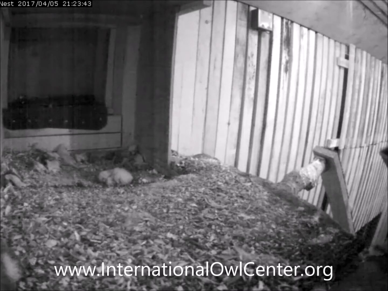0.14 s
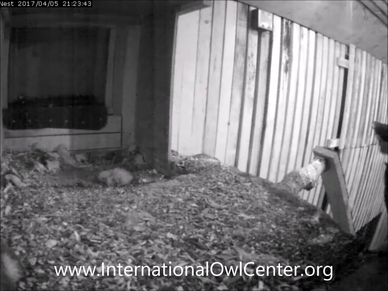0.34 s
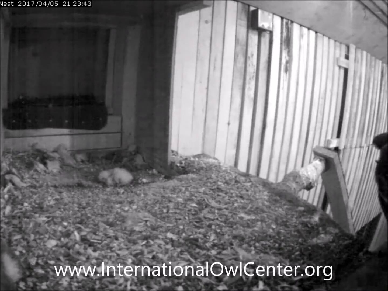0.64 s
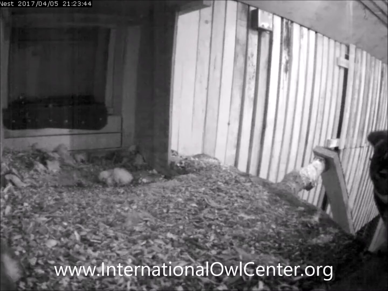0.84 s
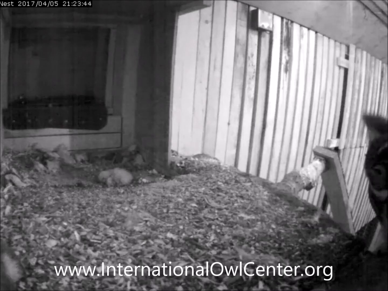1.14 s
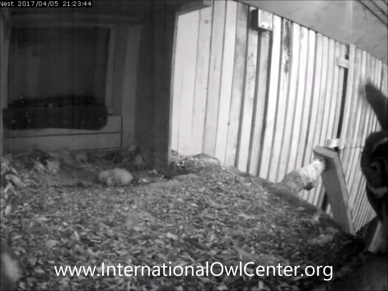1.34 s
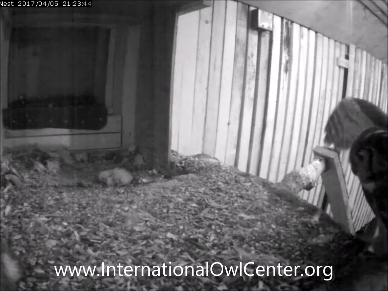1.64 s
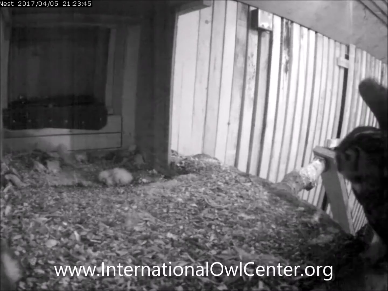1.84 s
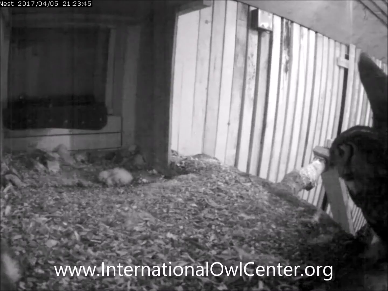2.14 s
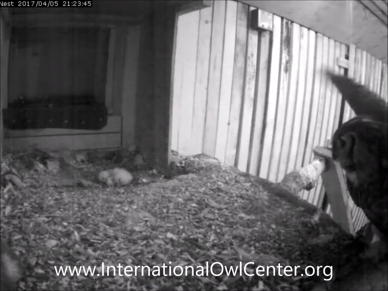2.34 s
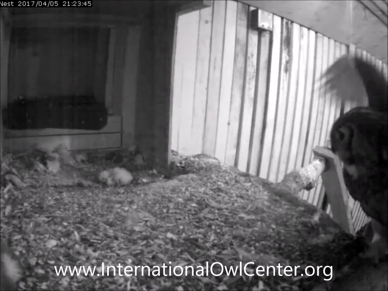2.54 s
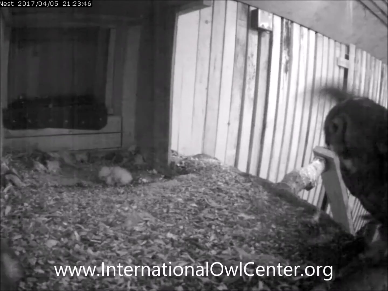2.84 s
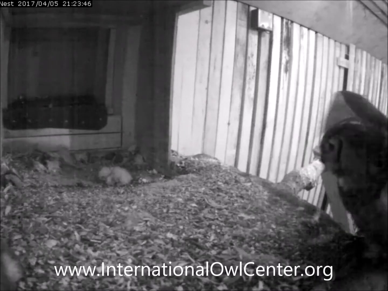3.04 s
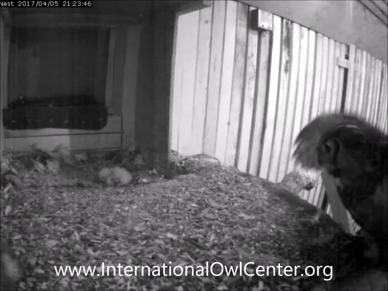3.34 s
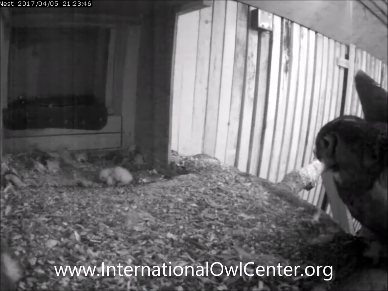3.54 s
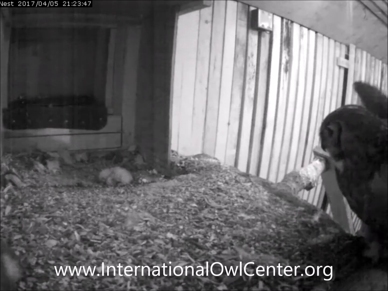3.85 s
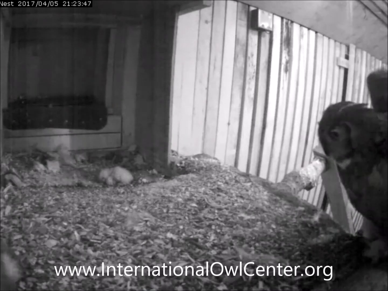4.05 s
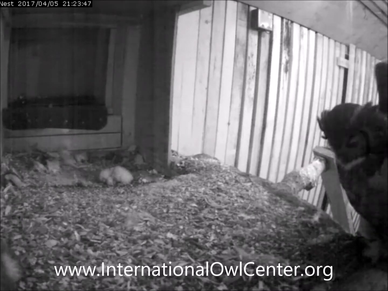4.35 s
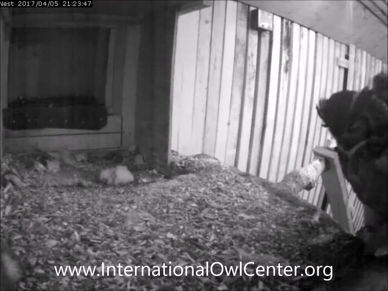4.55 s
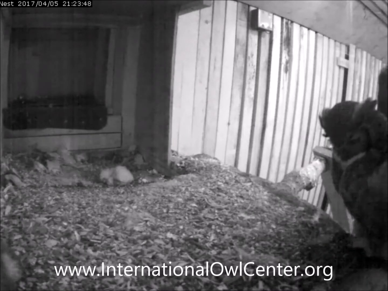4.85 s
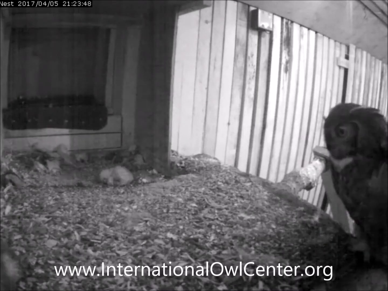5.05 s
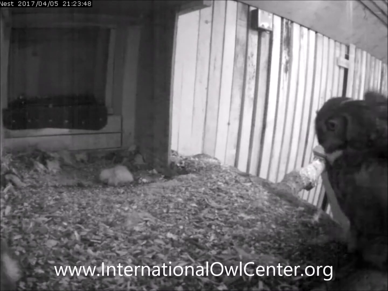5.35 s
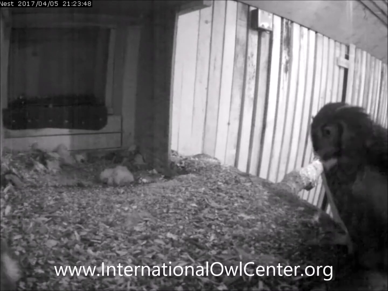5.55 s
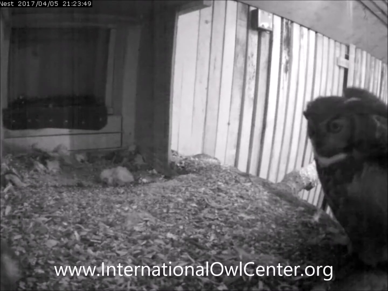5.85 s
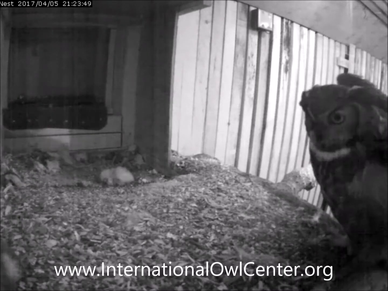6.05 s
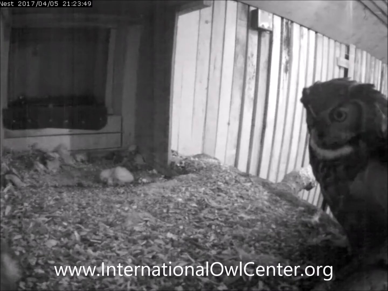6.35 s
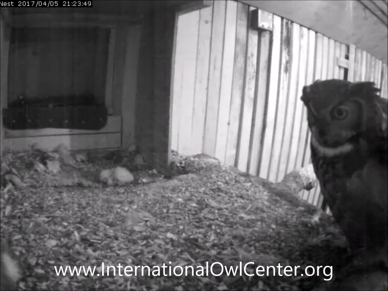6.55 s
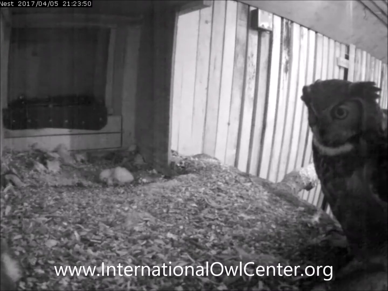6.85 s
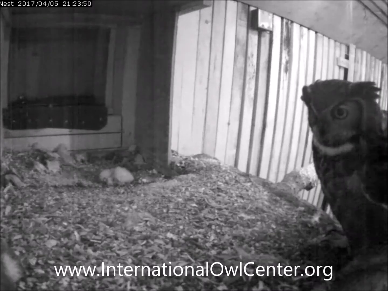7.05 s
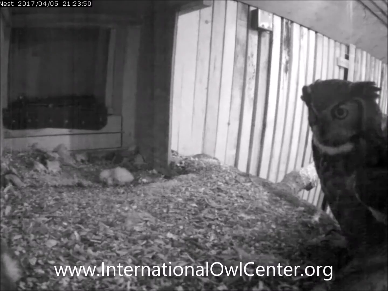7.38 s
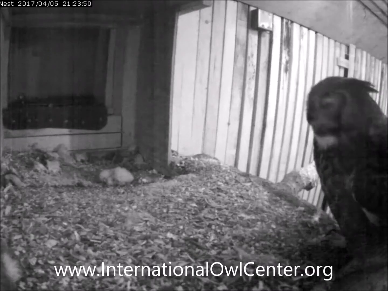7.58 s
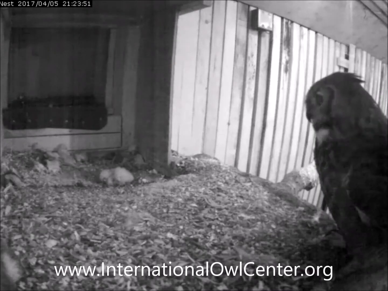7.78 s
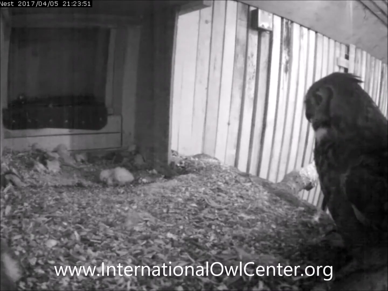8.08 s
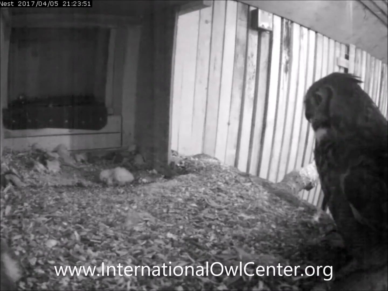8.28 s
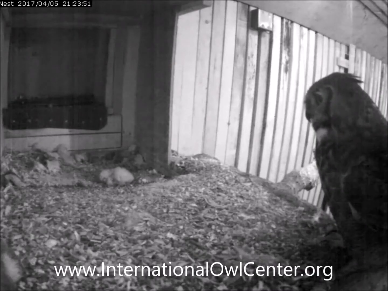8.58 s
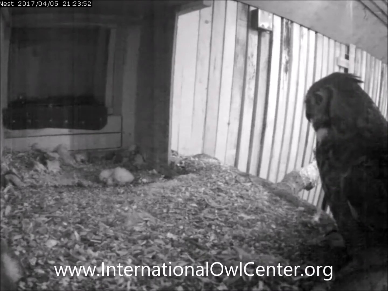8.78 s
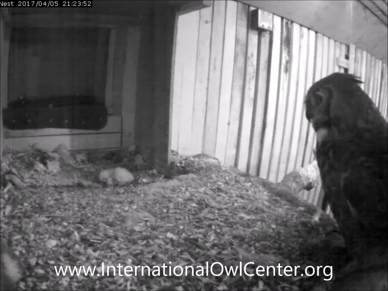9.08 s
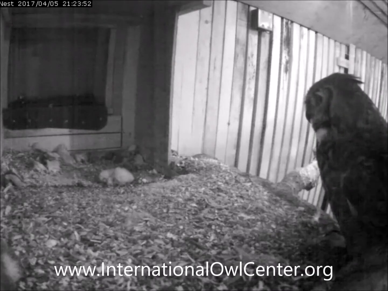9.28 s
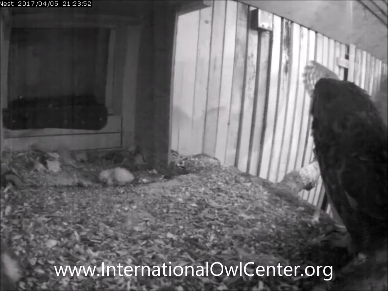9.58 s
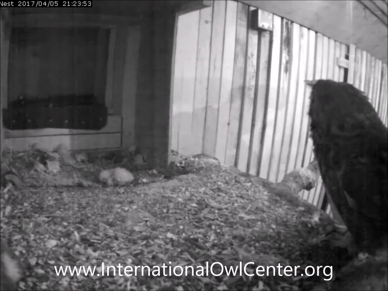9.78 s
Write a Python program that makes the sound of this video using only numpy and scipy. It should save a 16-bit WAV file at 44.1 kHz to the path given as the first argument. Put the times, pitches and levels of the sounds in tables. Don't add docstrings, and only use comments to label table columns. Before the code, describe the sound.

Dry wooden claw taps and feathery rustles, brief high chirrups nearby, one hard knock, then low wing puffs swelling over hiss and faint motor hum.

```python
import sys
import numpy as np
from scipy import signal
from scipy.fft import rfft, irfft, next_fast_len
from scipy.io import wavfile
from scipy.ndimage import uniform_filter1d

SR = 44100
rng = np.random.default_rng(int(sys.argv[2]) if len(sys.argv) > 2 else 0)


def gain_from_db(level_db):
    decades = np.asarray(level_db, float) / 20
    return 10 ** decades


def wrap_up_sound(samples):
    columns = np.atleast_2d(samples).T
    tamed = np.clip(columns, -1, 1)
    steps = np.round(tamed * 32767).astype(np.int16)
    wavfile.write(sys.argv[1], SR, steps)


N = 437472

# frequency in Hz, level in dB per Hz.
HISS_SPECTRUM = [(12, -73.5), (20, -32), (60, -20), (90, -19), (149, -7.5), (264, -6.5), (392, -7.5),
                 (541, -6), (785, -8), (1260, -10.5), (2230, -14), (2920, -14.5), (3750, -16),
                 (6790, -16.5), (7500, -28.5), (9750, -78), (16500, -120)]
HISS_DB = -45.5
CAPSULE_HZ, CAPSULE_WIDTH_HZ, CAPSULE_DB = 2819, 357, -49.5
MOTOR_HZ = 106.27
# multiple of the motor pitch, level in dB rms.
MOTOR_OVERTONES = [(3, -67), (4, -59.5), (5, -58), (7, -69.5)]

# frequency in Hz, level in dB per Hz.
PUFF_SPECTRUM = [(12, -57.5), (20, -30.5), (258, -2.5), (340, -2.5), (382, -3), (493, -3.5), (676, -4.5),
                 (807, -4.5), (2200, -19.5), (2860, -41.5), (4840, -120)]
# frequency in Hz, level in dB per Hz.
FEATHER_SPECTRUM = [(710, -26), (1200, -7), (2660, -6.5), (6580, -20), (7050, -21), (7500, -69),
                    (9750, -110), (16500, -120)]
# peak in seconds, puff level in
# dB, feather hiss in dB above the puff.
BEATS = [(7.745, -43, -3), (8.0, -42, -8), (8.2, -46, -5), (8.28, -42, -12), (8.41, -34.5, -8.5),
         (8.61, -36, -4.5), (8.8, -33.5, -10), (8.95, -36.5, -7.5), (9.16, -31, -8.5), (9.35, -32, -11),
         (9.57, -31, -11), (9.63, -42, 3), (6.25, -42, -25)]
BEAT_SWELL_S, BEAT_FADE_S = .11, .19
# time in seconds, level in dB.
STIRRED_AIR = [
    (7.55, -70),
    (7.66, -56),
    (7.8, -46),
    (8.15, -44),
    (9.0, -42),
    (9.64, -42),
    (9.75, -56),
    (9.84, -50),
    (9.92, -62),
]
STIR_FEATHER_DB = -10.5
# start in seconds,
# level in dB, pitch in Hz, t60 in seconds.
SLAPS = [(7.686, -36, 530, .04), (7.727, -33, 996, .03), (7.75, -33, 450, .04), (7.849, -35, 493, .04),
         (7.907, -36, 474, .03), (7.941, -36, 493, .03), (7.99, -32, 450, .03), (7.995, -32, 980, .04),
         (8.13, -35, 800, .03), (8.213, -34, 487, .04), (8.411, -31, 315, .05), (8.611, -30, 345, .05),
         (8.843, -32, 471, .04), (8.936, -31, 226, .06), (9.049, -31, 385, .05), (9.150, -24, 600, .025),
         (9.18, -27, 230, .05), (9.304, -27, 382, .05), (9.335, -25, 480, .05), (9.362, -24, 750, .07),
         (9.288, -30, 1000, .04), (9.32, -28, 1100, .04), (4.672, -24, 210, .1), (9.385, -25, 700, .04),
         (9.433, -29, 401, .04), (9.535, -22, 380, .06), (9.555, -23, 270, .06), (9.566, -23, 420, .05),
         (9.597, -28, 1150, .05)]

# start in seconds, drop's start in Hz, drop level in dB, flick delay in seconds, flick level in dB.
CHIRRUPS = [
    (2.649, 2500, -39, .043, -31),
    (2.936, 3020, -40, .0305, -24.5),
    (3.515, 3400, -55, .026, -31),
    (3.640, 3400, -27.5, .034, -29.5),
    (3.774, 3800, -25, .035, -26),
    (3.889, 3300, -33, .03, -55),
    (4.301, 2450, -32, .0125, -29),
    (4.425, 3155, -26, .037, -29.5),
    (4.56, 3800, -24.5, .034, -32),
]
DROP_END_HZ, DROP_S = 2100, .0072
HOLD_AFTER_S, HOLD_HZ, HOLD_END_HZ, HOLD_S, HOLD_DB = .006, 4000, 4300, .015, -11
LEAD_HZ, LEAD_S, LEAD_DB = 2900, .004, -14
FLICK_HZ, FLICK_END_HZ, FLICK_S = 3480, 4100, .0055
TOP_AFTER_S, TOP_HZ, TOP_END_HZ, TOP_S, TOP_DB = .0042, 4000, 4400, .0065, -1.5
# start in seconds, pitch
# in Hz, # length in seconds, level in dB.
PEEPS = [(2.674, 2700, .007, -37), (2.936, 2800, .007, -29), (2.944, 2900, .005, -28),
         (3.082, 3750, .014, -34), (3.102, 3000, .025, -35), (3.893, 4250, .014, -34),
         (3.911, 3890, .013, -39.5), (3.921, 3000, .025, -33), (4.432, 2950, .0037, -26),
         (4.45, 2800, .004, -36), (4.471, 2900, .0061, -35), (4.6865, 3750, .005, -20),
         (4.810, 4300, .0097, -36), (4.825, 4400, .04, -44), (4.811, 3070, .015, -37.5),
         (6.024, 1350, .026, -42), (2.649, 4200, .006, -44), (4.316, 3700, .0045, -26),
         (4.301, 3900, .004, -44), (4.321, 3100, .007, -38), (4.567, 3100, .006, -31),
         (3.646, 3100, .008, -33), (4.46, 2900, .006, -39)]
PEEP_SAG = .09
OVERTONE_DB, WOBBLE = -23, .015
BREATH_DB, BREATH_LOW_HZ, BREATH_HIGH_HZ, BREATH_FADE_S = -11, 2000, 4600, .018

# frequency in Hz, level in dB per Hz.
RUSTLE_LOW = [(60, -68), (150, -17), (330, -15), (620, -1), (1100, -4.5), (2000, -7.5), (2600, -16),
              (3300, -43)]
# frequency in Hz, level in dB per Hz.
RUSTLE_HIGH = [(820, -31), (1400, -5), (1910, -19), (2470, 5.5), (6080, -9.5), (7240, -23), (7500, -69),
               (9750, -95), (16500, -120)]
# peak in seconds, level in dB, swell in seconds per 20 dB, fade in seconds per 20 dB, brightness in
# dB.
DRAGS = [(.492, -31.5, .065, .05, 3), (1.09, -55, .2, .12, 10), (1.525, -43, .15, .06, -6.5),
         (1.61, -41.5, .025, .03, 0), (1.85, -47, .2, .3, -2), (1.927, -41, .04, .06, -4),
         (2.045, -33, .13, .05, -5), (2.1, -46, .1, .1, -4), (2.77, -41, .07, .05, 1),
         (2.845, -37, .04, .05, 8), (3.095, -41, .03, .04, 2), (3.2, -32, .03, .12, -5),
         (3.27, -43, .1, .2, 1), (4.19, -37, .04, .1, -1), (4.615, -28.5, .015, .22, -5),
         (4.7, -28, .07, .085, -5), (4.8, -42, .06, .22, -1.5), (4.96, -48, .2, .3, -2),
         (5.405, -36.5, .04, .05, -7.5), (5.542, -34, .07, .07, -1), (5.61, -49, .1, .15, -2),
         (6.205, -40, .03, .03, 5), (6.78, -45, .1, .1, 1.5), (6.9, -45, .14, .06, 0),
         (7.74, -40, .04, .05, 2), (7.855, -46, .03, .04, -5), (7.997, -41, .03, .04, -8),
         (8.215, -46, .03, .03, 0), (9.152, -36, .03, .03, -3), (9.55, -39, .02, .2, 1),
         (2.225, -50, .04, .04, 0), (.455, -40, .02, .05, 0)]
DRAG_BEND = 1.6

# start in seconds, level in dB, t60 in seconds, lowest frequency in Hz.
TEARS = [(6.2213, -22, .03, 2400), (6.2258, -24, .025, 3200), (2.8296, -21, .04, 900),
         (2.8503, -19, .02, 800), (2.8555, -25, .04, 900), (2.9136, -24, .035, 700),
         (3.1381, -22, .035, 1600), (3.0825, -33, .08, 900), (3.6562, -30, .008, 3000),
         (3.2185, -28, .02, 1200), (7.738, -32, .05, 1200), (4.712, -33, .14, 2400),
         (7.3615, -36, .04, 1200), (1.5200, -37, .06, 700), (6.877, -38, .05, 700)]
# frequency in Hz, level in dB, t60 in seconds.
BOARD_MODES = [(248, -2, 0.14), (573, -30, 0.038), (710, 4, 0.19), (900, -1, 0.09), (1120, -24, 0.067),
               (1250, 4, 0.078), (1360, -27, 0.056)]
# frequency in Hz, level in dB, t60 in seconds.
EDGE_MODES = [(1700, -15.5, 0.013), (2016, -3.5, 0.021), (2300, 8.5, 0.012), (2823, 3.5, 0.017),
              (3400, 1.5, 0.027), (3800, 2, .03)]
# frequency in Hz, level in dB, t60 in seconds.
TIP_MODES = [(4300, 6, 0.04), (4820, 11, 0.015), (5570, 16, 0.0083), (6630, -10.5, 0.034)]
# start in seconds, board level in dB, edge level in dB, pitch of the struck spot in Hz.
PADS = [(0.4785, -28, -28, 900), (1.9785, -25, -27, 1125), (2.0065, -24, -23, 1030),
        (2.0152, -23, -33, 810), (2.7641, -28, -35, 800), (2.8032, -35, -32, 625), (2.8807, -26, -32, 2010),
        (3.218, -34, -28, 2220), (4.6712, -20, -20, 1750), (4.6731, -15, -20, 1300),
        (4.6801, -20, -24, 711), (5.5064, -31, -26.5, 930), (5.8568, -32, -31, 770),
        (6.2212, -30, -27, 2100), (9.5313, -35, -30.5, 545)]
# start in seconds, edge level in dB, board level in dB, pitch in Hz.
RAPS = [(1.5198, -33.5, -40, 980), (1.6057, -35.5, -40, 1240), (1.925, -28, -43, 1030),
        (2.0251, -24.5, -35, 1290), (2.0407, -16, -32, 2050), (2.044, -20, -27, 800),
        (2.8547, -25, -36, 620), (3.169, -24, -44, 2800), (3.2899, -26.5, -40, 2180),
        (3.7839, -20, -39.5, 2230), (3.8235, -11.5, -23.5, 1183), (4.171, -27, -32, 1600),
        (4.6065, -23, -38, 1990), (5.4039, -31, -40.5, 1060), (5.5505, -18, -31, 886),
        (5.5843, -44, -43, 690), (6.031, -48, -44, 1280), (6.8757, -27.5, -46, 1010),
        (7.3614, -26.5, -50, 2100), (9.1519, -18, -27, 649)]
# start in seconds, tip level in dB, edge level in dB, pitch in Hz.
SNAPS = [(0.4815, -33, -24, 2420), (0.953, -43, -39, 638), (1.1052, -35, -48, 890),
         (1.8525, -41, -31, 1250), (1.881, -33, -30, 990), (2.8295, -22, -21, 1264),
         (2.8501, -21, -24, 1045), (2.9135, -27, -23, 1236), (3.138, -22, -24, 2950),
         (3.1825, -21, -20, 2700), (3.6563, -31.5, -46, 2450), (4.9642, -40.5, -34, 870),
         (5.0022, -37, -34, 1300), (6.1999, -34, -38, 966), (6.2255, -25, -28, 863),
         (9.7655, -30, -37, 616)]
PAD_TIP_DB, RAP_TIP_DB, SNAP_BOARD_DB = -38, -21, -19
PAD_CHATTER_S, RAP_CHATTER_S, SNAP_CHATTER_S = .045, .045, .036
# start in
# seconds, level in dB, pitch in Hz, t60 in seconds.
WOOD_RINGS = [(.446, -30, 1000, .02), (.4782, -19, 950, .018), (.4795, -24, 3200, .012), (.4805, -30, 2550, .03),
              (.4855, -22, 2500, .03), (.4935, -30, 1700, .02), (.504, -31, 1100, .025), (1.9795, -24, 1800, .02),
              (1.9805, -19, 950, .03), (1.984, -26, 1900, .02), (2.0413, -18, 2200, .015),
              (2.0435, -16.5, 850, .03), (2.046, -18, 2350, .02), (2.051, -25, 2300, .025),
              (3.1385, -16, 3100, .015), (3.1705, -24, 1550, .02), (3.173, -25, 2900, .03),
              (3.1835, -17, 2800, .02), (3.188, -20, 2900, .025), (3.195, -24, 1200, .04), (3.209, -26, 650, .04),
              (3.2185, -24, 2200, .02), (3.7865, -20, 2150, .015), (3.8235, -21, 2900, .03),
              (4.171, -33, 2900, .03), (4.608, -22, 2000, .04), (4.621, -26, 620, .025), (4.630, -24, 900, .03),
              (4.636, -26, 1300, .025), (4.6685, -26, 3700, .02), (4.6708, -9, 1900, .01),
              (4.6727, -3, 680, .014), (4.6732, -9, 1500, .01), (4.6768, -11, 1850, .015),
              (4.6805, -12, 1080, .02), (4.684, -20, 1800, .015), (4.686, -17, 710, .1), (4.693, -27, 3300, .015),
              (.474, -34, 6100, .06), (.4835, -33, 5000, .03), (.453, -34, 4000, .03), (.452, -33, 2500, .02),
          (2.040, -24, 5900, .012), (2.0403, -22, 4300, .01), (2.045, -24, 6000, .015),
          (2.0455, -25, 4800, .012), (1.9785, -28, 2600, .015), (3.138, -20, 4000, .008),
          (3.1382, -21, 2200, .01), (3.142, -25, 2500, .015), (3.163, -31, 3000, .02),
          (3.171, -30, 6200, .03), (3.1865, -26, 6200, .02), (4.6065, -27, 5300, .02),
          (4.6068, -27, 3200, .012), (4.651, -29, 2300, .05), (6.2213, -20, 5000, .008),
          (6.2215, -23, 3300, .008), (6.2225, -22, 900, .018), (6.231, -36, 5400, .2),
          (6.229, -36, 1500, .08), (6.2255, -24, 4000, .015), (6.2262, -23, 5500, .015),
          (6.2275, -30, 2100, .05), (6.229, -24, 4700, .012), (6.230, -31, 830, .06),
          (6.2015, -35, 3300, .015), (6.206, -31, 3900, .02), (4.172, -23, 1950, .03),
          (4.1745, -25, 1300, .03), (4.1715, -31, 4600, .02), (2.8297, -19, 3000, .02),
          (2.8335, -24, 3700, .025), (2.830, -24, 1150, .06), (2.8505, -22, 3100, .015),
          (2.856, -24, 3100, .02), (2.856, -26, 5000, .015), (2.914, -26, 3000, .02),
          (2.8505, -23, 5800, .012), (2.7655, -31, 1250, .05), (2.8505, -22, 1150, .04),
          (3.094, -30, 1450, .07), (7.724, -33, 1000, .05), (7.992, -34, 1600, .04),
          (4.6735, -14, 2200, .008), (4.6775, -16, 2300, .01)]

CUTOFF_HZ = 7080
STREAM_SR, FRAME_START = 16000, 1008
# start in seconds, end in seconds.
SHORT_SPANS = [
    (1.983, 2.047),
    (2.751, 2.943),
    (3.071, 3.199),
    (3.647, 3.967),
    (4.287, 4.351),
    (4.479, 4.607),
    (6.143, 6.271),
]
# frequency in Hz, step in dB over the band's rms.
LONG_STEP = [(100, -2.5), (1500, 3.5), (3000, 3.5), (4500, 8.5), (7000, 8)]
# frequency in Hz, step in dB over the block's rms.
SHORT_STEP = [(100, -1), (600, -2), (2800, -7), (4500, -1.5), (7000, 1)]
APART_S = [0.22, 0.60, 1.13, 1.18, 1.38, 2.41, 2.60, 4.39, 5.41, 6.63, 7.47, 7.52]
# start in seconds, end in seconds, extra coarseness in dB, silent below this frequency in Hz.
STARVED = [
    (2.816, 2.823, 8, 0),
    (2.866, 2.908, 5, 0),
    (3.140, 3.150, 0, 1400),
    (3.150, 3.166, 11, 2000),
    (3.794, 3.812, 6, 2000),
    (6.232, 6.271, 8, 0),
    (4.548, 4.566, 3, 700),
]
LEAK_DB = -32


def rms_one(x):
    return x / np.sqrt(np.mean(x ** 2) + 1e-20)


def drift(rate):
    r = np.exp(-80 * np.pi * rate / SR)
    noise = rng.standard_normal(N // 40 + 2002)
    slow = signal.lfilter([1], [1, -2 * r, r * r], noise)[2000:]
    return np.interp(np.arange(N) / 40, np.arange(len(slow)), rms_one(slow))


def coloured(x, spectrum):
    size = next_fast_len(N)
    hz, level_db = np.transpose(spectrum)
    log_bins = np.log(np.arange(size // 2 + 1) * SR / size + 1)
    gain = gain_from_db(np.interp(log_bins, np.log(hz), level_db, left=-80, right=-80))
    return rms_one(irfft(rfft(x, size) * gain, size)[:N])


def grains(per_s, spread_db, smooth):
    sizes = gain_from_db(spread_db * np.minimum(rng.exponential(1, N), 5)) * rng.choice([-1, 1], N)
    clicks = rms_one(sizes * (rng.random(N) < per_s / SR))
    return rms_one(clicks + smooth * rng.standard_normal(N))


def swells(peak_s, level_db, swell_s, fade_s, bend=1):
    power = np.zeros(N // 64 + 2)
    t = np.arange(len(power)) * 64 / SR
    for s, db, up, down in np.broadcast(peak_s, level_db, swell_s, fade_s):
        distance = np.maximum((s - t) / up, (t - s) / down)
        power += gain_from_db(db - 20 * distance ** bend) ** 2
    return np.interp(np.arange(N) / SR, t, np.sqrt(power))


def rings(rows, cut_hz):
    t = np.arange(int(.12 * SR)) / SR
    out = np.zeros(N + len(t))
    for s, db, hz, t60 in rows:
        at = round(s * SR)
        out[at:at + len(t)] -= gain_from_db(db - 60 * t / t60) * np.sin(2 * np.pi * hz * t)
    return signal.sosfilt(signal.butter(4, cut_hz, "high", fs=SR, output="sos"), out[:N])


def box(x, wet_db, t60):
    t = np.arange(int(.15 * SR)) / SR
    tail = rng.standard_normal(len(t)) * gain_from_db(-60 * t / t60) * (t > .002)
    tail /= np.sqrt(np.sum(tail ** 2))
    return x + gain_from_db(wet_db) * signal.oaconvolve(x, tail)[:N]


def floor():
    hiss = gain_from_db(HISS_DB - 2.0 + 0.39 * drift(1.9)) * coloured(rng.standard_normal(N), HISS_SPECTRUM)
    edges = [CAPSULE_HZ - CAPSULE_WIDTH_HZ / 2, CAPSULE_HZ + CAPSULE_WIDTH_HZ / 2]
    capsule = signal.butter(2, edges, "band", fs=SR, output="sos")
    whistle = rms_one(signal.sosfilt(capsule, rng.standard_normal(N)))
    turn = 2 * np.pi * np.cumsum(MOTOR_HZ * (1 + .0015 * drift(1.19))) / SR
    hum = sum(gain_from_db(db + 3.0 + 2.0 * drift(5.1)) * np.sin(k * turn) for k, db in MOTOR_OVERTONES)
    return hiss + gain_from_db(CAPSULE_DB + 1.5 * drift(3.6)) * whistle + hum


def wings():
    s, db, feather_db = np.transpose(BEATS)
    stir = gain_from_db(np.interp(np.arange(N) / SR, *np.transpose(STIRRED_AIR), left=-99))
    lumps = gain_from_db(1.5 * drift(17))
    puff = coloured(grains(2000, spread_db=3.2, smooth=1.5), PUFF_SPECTRUM)
    feather = coloured(grains(3000, spread_db=2.0, smooth=1.1), FEATHER_SPECTRUM)
    push = np.hypot(stir, swells(s, db, BEAT_SWELL_S, BEAT_FADE_S))
    hiss = np.hypot(stir * gain_from_db(STIR_FEATHER_DB), swells(s, db + feather_db, BEAT_SWELL_S, BEAT_FADE_S))
    return lumps * (push * puff + hiss * feather)


def notes():
    out = [(s, hz, hz * (1 - PEEP_SAG), length, db) for s, hz, length, db in PEEPS]
    for s, hz, db, gap, flick_db in CHIRRUPS:
        flick_s = s + gap
        out += [(s, hz, DROP_END_HZ, DROP_S, db),
                (s + HOLD_AFTER_S, HOLD_HZ, HOLD_END_HZ, HOLD_S, db + HOLD_DB),
                (flick_s, FLICK_HZ, FLICK_END_HZ, FLICK_S, flick_db),
                (flick_s + TOP_AFTER_S, TOP_HZ, TOP_END_HZ, TOP_S, flick_db + TOP_DB),
                (flick_s - LEAD_S, LEAD_HZ, FLICK_HZ, LEAD_S + .001, flick_db + LEAD_DB)]
    return out


def breath():
    s, start_hz, end_hz, length, db = np.transpose(notes())
    band = signal.butter(3, [BREATH_LOW_HZ, BREATH_HIGH_HZ], "band", fs=SR, output="sos")
    air = rms_one(signal.sosfilt(band, rng.standard_normal(N)))
    return swells(s + length / 2, db + BREATH_DB, length, length + BREATH_FADE_S) * air


def chitter():
    out = np.zeros(N)
    shake = drift(320)
    for s, start_hz, end_hz, length, level_db in notes():
        part = np.arange(int(length * SR)) / (length * SR)
        at = round(s * SR)
        wobble = 1 + WOBBLE * shake[at + 99:at + 99 + len(part)]
        hz = (start_hz + (end_hz - start_hz) * part) * wobble
        phase = 2 * np.pi * np.cumsum(hz) / SR
        tone = np.sin(phase) + gain_from_db(OVERTONE_DB) * np.sin(2 * phase)
        envelope = np.sin(np.pi * part ** .55) ** .9
        out[at:at + len(part)] += gain_from_db(level_db + 4) * envelope * tone
    return box(out * gain_from_db(2.6 * shake), wet_db=-6.5, t60=0.05)


def rustle():
    s, db, up, down, bright_db = np.transpose(DRAGS)
    clumps = gain_from_db(2.5 * drift(45))
    low = coloured(grains(1500, spread_db=3.0, smooth=0.76), RUSTLE_LOW)
    high = coloured(grains(2800, spread_db=4.0, smooth=0.93), RUSTLE_HIGH)
    dull = swells(s, db, up, down, DRAG_BEND) * low
    bright = swells(s, db + bright_db - 1.2, up, down, DRAG_BEND) * high
    return gain_from_db(-4.0) * clumps * (dull + bright)


def tears():
    t = np.arange(int(.08 * SR)) / SR
    out = np.zeros(N + len(t))
    for s, db, t60, low_hz in TEARS:
        burst = rng.standard_normal(len(t)) * gain_from_db(db - 60 * t / t60) * (1 + 2.5 * (t < .0004))
        band = signal.butter(2, [low_hz, 6800], "band", fs=SR, output="sos")
        at = round(s * SR)
        out[at:at + len(t)] += signal.sosfilt(band, burst)
    return out[:N]


def contacts():
    pads = [(s, edge, db, db + PAD_TIP_DB, PAD_CHATTER_S, hz) for s, db, edge, hz in PADS]
    raps = [(s, db, board, db + RAP_TIP_DB, RAP_CHATTER_S, hz) for s, db, board, hz in RAPS]
    snaps = [(s, edge, db + SNAP_BOARD_DB, db, SNAP_CHATTER_S, hz) for s, db, edge, hz in SNAPS]
    return pads + raps + snaps


def knocks():
    t = np.arange(int(.12 * SR)) / SR
    modes = BOARD_MODES + EDGE_MODES + TIP_MODES
    out = np.zeros(N + len(t))
    for s, edge_db, board_db, tip_db, chatter_s, spot_hz in contacts():
        slips = rng.standard_normal(len(t)) * (rng.random(len(t)) < .08)
        blow = 0.15 * slips * gain_from_db(-60 * t / chatter_s)
        blow[:2] = 1, -.4
        body = gain_from_db(max(edge_db, board_db) - 8) * np.sin(2 * np.pi * spot_hz * t) * gain_from_db(-60 * t / .035)
        drive_db = [board_db] * len(BOARD_MODES) + [edge_db] * len(EDGE_MODES) + [tip_db] * len(TIP_MODES)
        luck_db = rng.normal(0, 2.7, len(modes))
        for (hz, mode_db, t60), drive, luck in zip(modes, drive_db, luck_db):
            decay = gain_from_db(-60 * t / (.45 * t60))
            body += gain_from_db(drive + mode_db - 10.5 + luck) * np.sin(2 * np.pi * hz * t) * decay
        at = round(s * SR)
        out[at:at + len(t)] += signal.fftconvolve(blow, body)[:len(t)]
    no_bass = signal.butter(4, 330, "high", fs=SR, output="sos")
    struck = signal.sosfilt(no_bass, out[:N])
    return box(struck + rings(WOOD_RINGS, cut_hz=440) + rings(SLAPS, cut_hz=170), wet_db=-7.0, t60=.05)


def scene():
    mono = floor() + wings() + breath() + chitter() + rustle() + tears() + knocks()
    return np.array([mono, mono])


def lapped(x, size, change):
    n, k = np.arange(2 * size), np.arange(size)
    window = np.sin(np.pi * (n + .5) / (2 * size))
    cosines = np.cos(np.pi / size * np.outer(k + .5, n + .5 + size / 2))
    basis = window * cosines * np.sqrt(2 / size)
    blocks = np.pad(x, (size, 2 * size - len(x) % size)).reshape(-1, size)
    lines = np.hstack([blocks[:-1], blocks[1:]]) @ basis.T
    back = change(lines, (k + .5) * STREAM_SR / 2 / size) @ basis
    return (back[1:, :size] + back[:-1, size:]).ravel()[:len(x)]


def at_hz(points, hz):
    point_hz, point_db = np.transpose(points)
    return gain_from_db(np.interp(np.log(hz), np.log(point_hz), point_db))


def rounded(lines, step, hz):
    return np.sign(lines) * np.floor(np.abs(lines) / (step + 1e-9) + .4) * step * (hz < CUTOFF_HZ)


def long_frames(lines, hz):
    level = np.sqrt(np.mean(lines.reshape(len(lines), -1, 32) ** 2, axis=2))
    frame_level = np.sqrt(np.mean(level ** 2, axis=1, keepdims=True))
    step = level / (0.5 + level / .004) ** .47 + gain_from_db(-23.0) * frame_level
    luck = gain_from_db(1.5 * rng.standard_normal(level.shape))
    return rounded(lines, np.repeat(step * luck, 32, axis=1) * at_hz(LONG_STEP, hz), hz)


def short_blocks(lines, hz):
    power = uniform_filter1d(np.mean(lines ** 2, axis=1), size=3)
    level = np.sqrt(power + .3 * signal.lfilter([0, .3], [1, -.7], power))
    t = (np.arange(len(lines))[:, None] * 128 - 1024 + FRAME_START) / STREAM_SR
    starved_db = 0
    for start, end, db, low_hz in STARVED:
        starved_db = starved_db + (db + 40 * (hz < low_hz)) * ((t > start) & (t < end))
    luck = np.repeat(gain_from_db(4.1 * rng.standard_normal((len(lines), 16))), 8, axis=1)
    step = level[:, None] ** .72 * gain_from_db(starved_db - 9.0) * luck * at_hz(SHORT_STEP, hz)
    return rounded(lines, step, hz) + gain_from_db(LEAK_DB) * lines * (hz < CUTOFF_HZ)


def split_tiles(lines, hz):
    tiles = np.repeat(rng.random((len(lines), 48)) < .07, 16, axis=1)
    tiles[(np.array(APART_S) * STREAM_SR / 768 + .5).astype(int)] = True
    return gain_from_db(-10.0) * tiles * lines * rng.choice([-1, 1], lines.shape)


def camera_stream(x):
    lead = 1024 - FRAME_START
    low = np.pad(signal.resample_poly(x, 160, 441), (lead, 0))
    t = (np.arange(len(low)) - lead) / STREAM_SR
    sudden = sum((t > start) & (t < end) for start, end in SHORT_SPANS)
    share = uniform_filter1d(sudden * 1., size=96)
    loudness = np.sqrt(uniform_filter1d(low ** 2, size=64))
    calm = low / (1 + share * loudness / 0.0086)
    mid = share * lapped(low, 128, short_blocks) + (1 - share) * lapped(calm, 1024, long_frames)
    side = (1 - .8 * share) * lapped(mid, 768, split_tiles)
    pair = np.array([mid + side, mid - side])[:, lead:]
    pair = signal.resample_poly(pair, 441, 160, axis=1, window=("kaiser", 9))
    return np.pad(pair, ((0, 0), (0, 9)))[:, :N]


def band_limit(x):
    return signal.sosfilt(signal.butter(12, 8100, fs=SR, output="sos"), x)


def record(dry):
    dither = gain_from_db(-101.0) * rng.standard_normal(dry.shape)
    mix = camera_stream(dry[0]) + dither
    return band_limit(mix)


dry = scene()
out = record(dry)
wrap_up_sound(out)
```